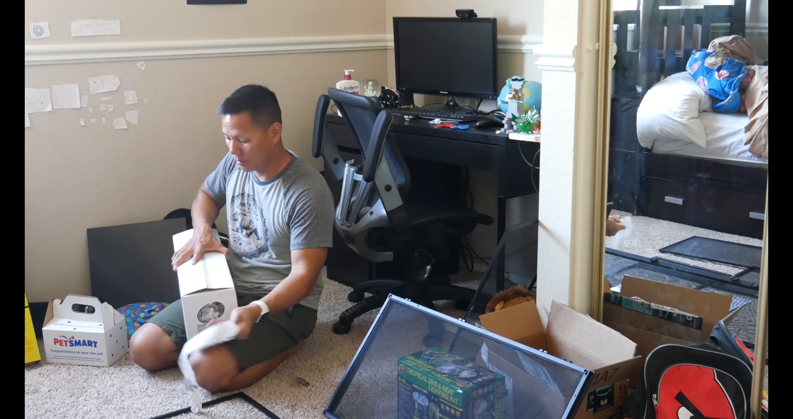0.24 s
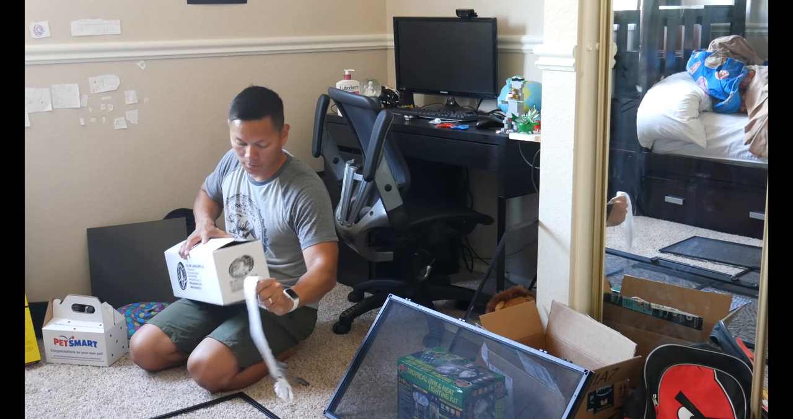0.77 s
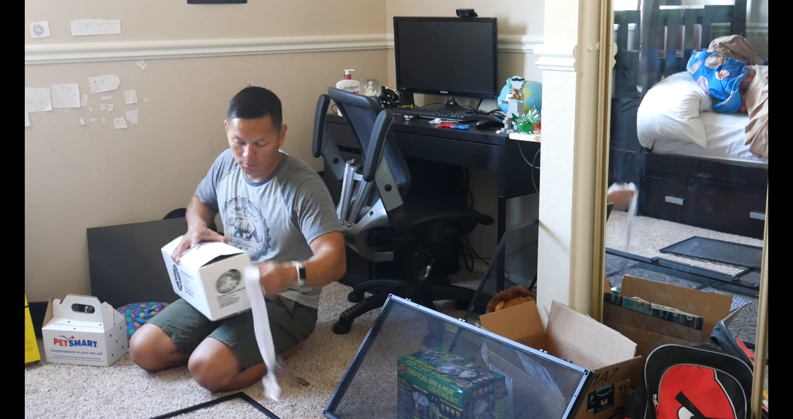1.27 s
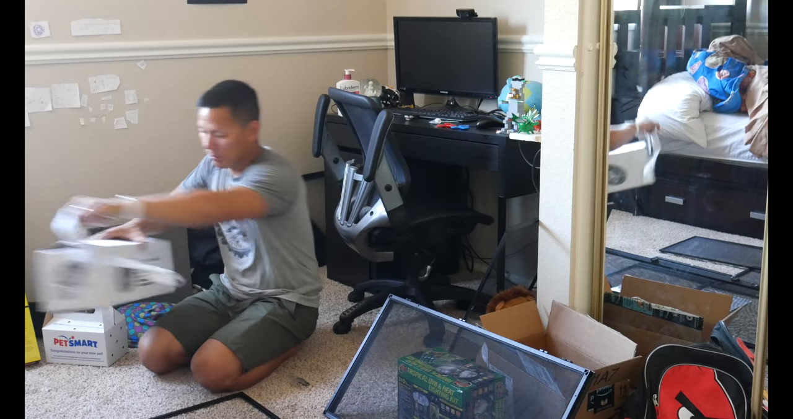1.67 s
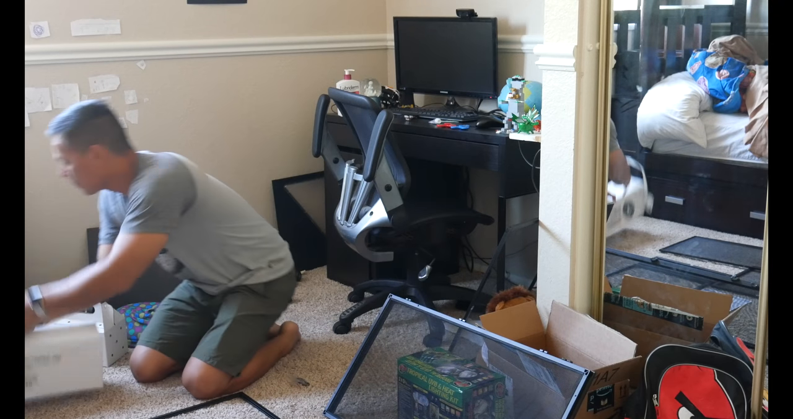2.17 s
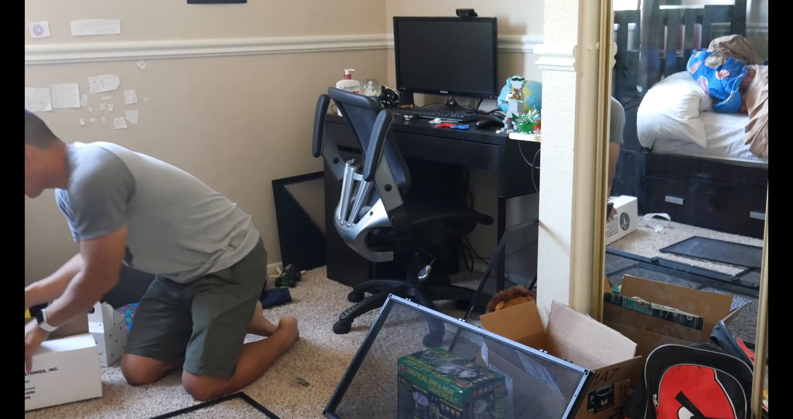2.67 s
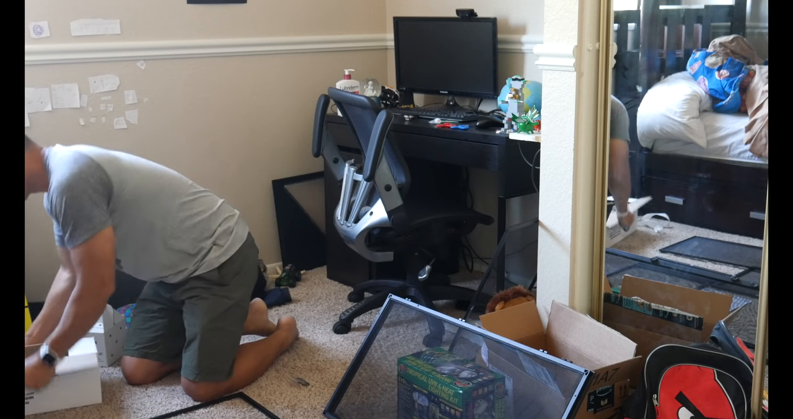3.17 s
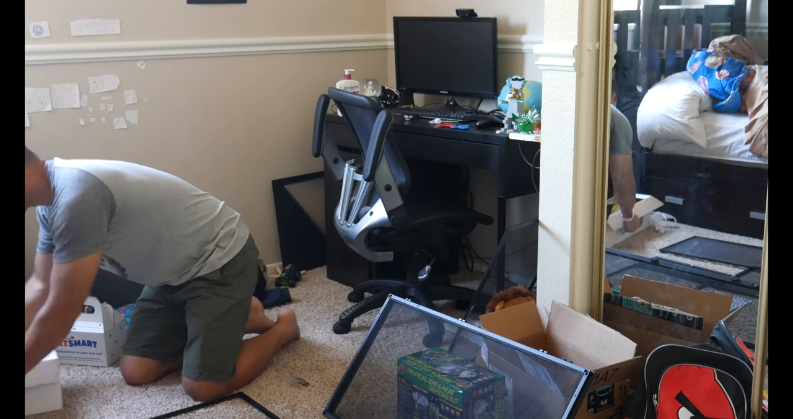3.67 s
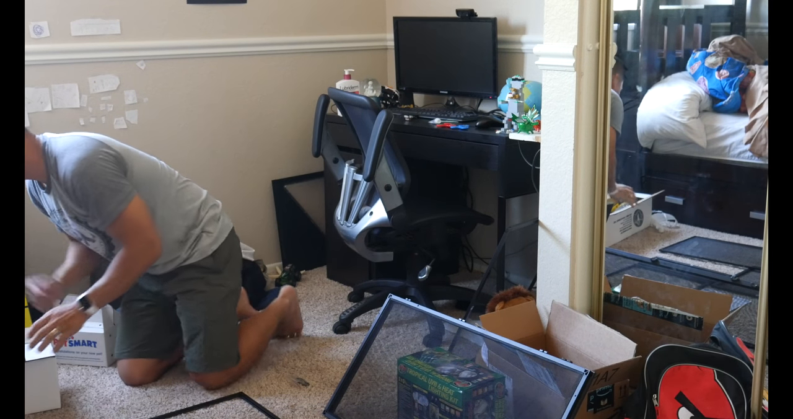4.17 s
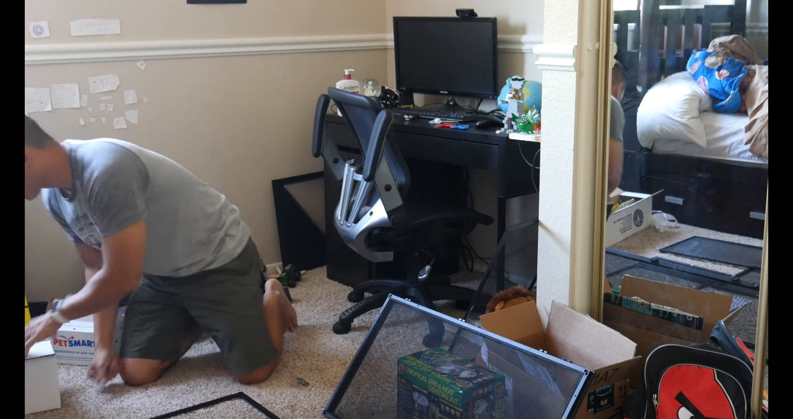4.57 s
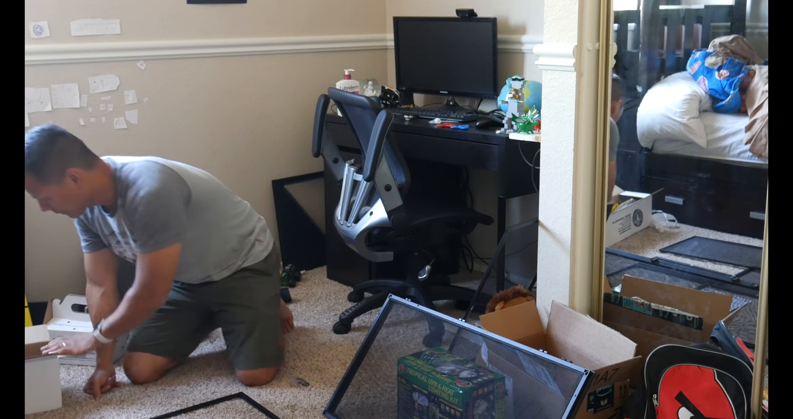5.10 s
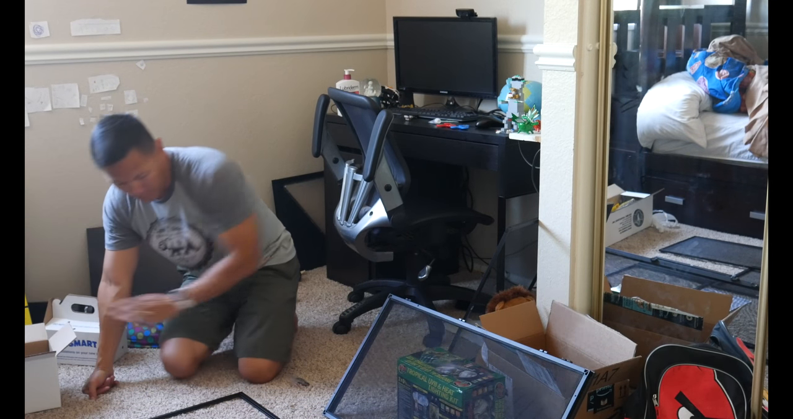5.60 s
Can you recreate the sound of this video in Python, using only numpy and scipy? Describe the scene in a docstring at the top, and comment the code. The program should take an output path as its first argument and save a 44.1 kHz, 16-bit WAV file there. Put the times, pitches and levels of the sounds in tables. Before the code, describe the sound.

Someone rubs and peels tape on a cardboard box, sets it down with a thump, then lightly shuffles boxes.

```python
"""In a small furnished room, a kneeling person peels tape off a cardboard box, sets the box down and
shuffles boxes on the carpet. Stick-slip friction of tape, skin and card drives the modes of the hollow
box and hisses off its surface. Impacts excite the same modes, and tape and card edges snap.
Knees and loads thud the floor at its low resonances; the room reverberates briefly over a faint tone."""
import sys
import numpy as np
from scipy import signal
from scipy.fft import rfft, irfft, next_fast_len
from scipy.io import wavfile
from scipy.ndimage import uniform_filter1d

SR = 44100
rng = np.random.default_rng(int(sys.argv[2]) if len(sys.argv) > 2 else 0)


def wrap_up_sound(samples):
    """Save the sound to the file named by the first command line argument, as 16-bit audio."""
    columns = np.atleast_2d(samples).T
    # keep every value between -1 and 1, then stretch to whole-number steps
    tamed = np.clip(columns, -1, 1)
    steps = np.round(tamed * 32767).astype(np.int16)
    wavfile.write(sys.argv[1], SR, steps)


N = 257808

# Friction spectra of the surface and its crackle. Each row: frequency in Hz, spectral density in dB.
SCRAPE_SPECTRUM = [(880, -0.5), (1500, -2), (1570, -2), (2060, -2.5), (2370, -2), (2960, 2.5), (3120, -1),
                   (5500, -19), (7150, -37), (12100, -120)]
CRACKLE_SPECTRUM = [(2350, -29.5), (4000, -8), (6640, -6), (7230, -8), (9560, -10), (13500, -13),
                    (15600, -24)]


def friction():
    """Stick-slip friction: coarse slips drive the box and join fine ones in hiss and crackle."""
    coarse = slips(1500, spread_db=1.5, clump_db=4.5)
    fine = slips(6000, spread_db=-1.0, clump_db=0.5)
    walls, flaps, liner = box_vibration(coarse)
    hiss = colour(fine * from_db(0.5 * drift(33)) + 0.44 * coarse, SCRAPE_SPECTRUM)
    scrape = rms_one(hiss) + 0.42 * rms_one(liner)
    crackle = colour(fine + 0.31 * coarse, CRACKLE_SPECTRUM)
    layers = zip(effort(), (walls, flaps, scrape, crackle))
    return high_pass(sum(gain * rms_one(x) for gain, x in layers), 161, order=6)


def slips(per_s, spread_db, clump_db):
    """A Poisson process of wandering rate: slips of uneven size come in clumps; rms 1."""
    sizes = from_db(spread_db * np.minimum(rng.exponential(1, N), 4)) * rng.choice([-1, 1], N)
    slipping = rng.random(N) < per_s * from_db(clump_db * drift(40)) / SR
    return rms_one(sizes * slipping)


# Modes of the box. Each row: frequency in Hz, level in dB, free decay time (t60) in seconds.
BOX_MODES = [(219, -14, 0.042), (235.2, -4, 0.088), (284.5, -3, 0.066), (347.7, -0.5, 0.043),
             (451, 3, 0.022), (528, -1.5, 0.067), (621, -5.5, 0.07), (785, -1, 0.055), (934, -2, 0.07),
             (1037.4, -7, 0.12), (1101, -4.5, 0.072), (1266, 2, 0.029), (1507, -7, 0.065),
             (1654, -1.5, 0.018), (2240, -26, 0.093), (2453, -10, 0.063), (2700, -10.5, 0.018),
             (2925, -9, 0.027), (3426, -18, 0.093), (3674, -13.5, 0.085)]
FLAPS_FROM_HZ, LINER_FROM_HZ = 480, 1900
RUB_T60_SHARE, KNOCK_T60_SHARE = 0.36, 0.54   # holding the box damps it


def box_vibration(drive):
    """Forced vibration of walls, flaps and liner; a shifting grip changes each mode's share."""
    parts = np.zeros((3, N))
    for k, (hz, level_db, t60) in enumerate(BOX_MODES):
        part = int(hz > FLAPS_FROM_HZ) + int(hz > LINER_FROM_HZ)
        share = from_db(level_db + 2.2 * drift(10.8))
        parts[part] += (-1) ** k * ring(drive * share, hz, RUB_T60_SHARE * t60)
    walls, flaps, liner = parts
    # a small box radiates no bass
    return high_pass(walls, 119, order=4), high_pass(flaps, 274, order=2), high_pass(liner, 1330, order=4)


# Light, unbroken rubbing. Each row: time in seconds, surface level in dB, then box over surface,
# crackle over surface and walls over flaps, all in dB.
RUBBING = [(0, -34, 0, -6, -8), (.2, -38.5, -5, -4, -0.5), (.45, -48, 0, -14, -0.5), (.68, -59, -8, -8, -5),
           (.9, -48, 1.5, -9, -3), (1.05, -63.5, 6, -7, -3.5), (1.2, -49.5, -2, -7, 7.5),
           (1.55, -48.5, 4.5, -18, -9.5), (1.71, -49.5, -10.5, -20, -14), (1.9, -58, -3, -20, -21),
           (2.0, -45.5, -11, -10, 6), (2.065, -55, 2, -10, 2), (2.1, -48.5, 1, -11, -2),
           (2.47, -52, 4.5, -11, 3.5), (2.8, -48, 1.5, -7, -1), (3.35, -47.5, 0, -13, 3),
           (3.65, -44, -6, -8, -7), (4.05, -62.5, 7, -12, -4), (4.22, -65.5, 2, -1.5, -1),
           (4.33, -59.5, 6, -12.5, -15), (4.64, -61.5, -7, -4, -6), (4.68, -53.5, 10, -16, 4.5),
           (4.95, -49, 2, -8.5, -7), (5.15, -56, 0.5, -7.5, 3.5), (5.6, -58.5, 6.5, -12, -7),
           (5.8, -60.5, 0, -10, -9)]
# Firm strokes of tape, hand or card. Each row: start and length in seconds, then surface level,
# change over the stroke, box over surface and crackle over surface, all in dB.
STROKES = [(0, 0.056, -25.5, -14.5, -3, -9), (0.145, 0.17, -25.5, 4, -0.5, -8.5),
           (0.538, 0.16, -33.5, -3, 0.5, -4.5), (0.723, 0.011, -32, -0.5, 0.5, -8.5),
           (1.224, .15, -49.5, 12.5, -21, -9.5), (1.616, .015, -42.5, -4.5, -18, -12.5),
           (1.773, 0.14, -40.5, 1.5, -9.5, -12), (2.206, .01, -45, 5, -16, -15),
           (2.279, 0.035, -26.5, -1.5, 2.5, -13.5), (2.391, 0.016, -40.5, 1, -1, -21),
           (2.84, 0.1, -43.5, -7, 3, -9), (3.006, 0.18, -43, -4.5, 5, -10.5),
           (3.265, 0.0081, -43.5, -3.5, 18.5, -31), (3.466, .12, -41.5, -4, -5.5, -10),
           (4.8, 0.085, -39.5, -4, 4, -8), (5.005, 0.021, -39, -2.5, -19, -14.5),
           (5.29, .04, -45, -8.5, 1, -20), (5.433, 0.065, -55.5, 8, 3.5, -9)]
RISE_DB_PER_S, FALL_DB_PER_S = 362, 244
SETTLE_DB, SETTLE_DB_PER_S = -9.5, 88   # a fainter rustle lingers after each stroke


def effort():
    """Incoherent sources add in power: rubbing and strokes give wall, flap, surface and crackle gains."""
    t = np.arange(N) / SR
    surface_db, box_db, crackle_db, walls_db = in_time(RUBBING)
    power = from_db(2 * (surface_db + np.array([box_db, np.zeros(N), crackle_db])))
    for start, length, level_db, change_db, box_db, crackle_db in STROKES:
        rise_db = -RISE_DB_PER_S * np.maximum(start - t, 0)
        held_db = level_db + change_db * np.clip((t - start) / length, 0, 1)
        after = np.maximum(t - start - length, 0)
        fade_db = np.maximum(-FALL_DB_PER_S * after, SETTLE_DB - SETTLE_DB_PER_S * after)
        balance_db = np.array([[box_db], [0], [crackle_db]])
        power += from_db(2 * (rise_db + held_db + fade_db + balance_db))
    box, surface, crackle = np.sqrt(power)
    return box * from_db(walls_db), box, surface, crackle


# Knocks on card. Each row: start in seconds, level in dB, pitch of the struck spot in Hz,
# contact decay time in seconds, fall of the modes in dB per octave away from that pitch.
KNOCKS = [(.12, -24, 260, 0.018, 12), (.158, -7, 272, 0.025, 0), (.189, -12, 646, 0.018, 22),
          (.249, -9, 275, 0.017, -0.5), (.278, -10.5, 310, .0099, -5), (.299, -16, 750, 0.019, 22),
          (.329, -22, 610, 0.043, -1), (.448, -21.5, 323, 0.032, 16), (0.473, -27, 284, 0.011, 28),
          (.605, -27, 258, 0.014, 15), (.729, -23, 990, .02, 5), (0.876, -35, 784, 0.025, 8),
          (1.074, -43, 700, 0.011, 18), (1.112, -38, 480, 0.029, 6), (.96, -40.5, 600, .03, 4),
          (1.206, -26, 720, 0.018, 19), (1.211, -35, 230, .015, 17), (1.235, -23.5, 106, .034, 3.5),
          (1.232, -23.5, 480, 0.032, 15), (1.356, -26, 350, 0.0095, 1), (1.993, -39, 252, .018, 0),
          (2.078, -24, 680, 0.028, 16), (2.083, -37, 224, .025, 21), (2.232, -22, 240, 0.0087, 14),
          (2.261, -6.5, 202, 0.02, 2.5), (2.278, -4.5, 408, 0.012, 15), (2.32, -13.5, 375, 0.034, 30),
          (2.408, -25, 266, 0.017, 2), (2.523, -11, 450, 0.026, 4.5), (2.53, -15.5, 250, 0.026, 3),
          (2.568, -24, 230, 0.01, 2), (2.62, -28, 246, 0.013, 8), (2.718, -32.5, 234, 0.04, 4),
          (2.959, -34, 262, .02, 8), (2.986, -22, 425, 0.03, 1.5), (3.035, -29, 198, 0.019, 6),
          (3.151, -22, 463, 0.018, 4), (3.196, -25, 198, 0.033, 25), (3.215, -26, 230, 0.013, 22),
          (3.241, -15, 465, 0.0091, 1), (3.257, -18, 263, 0.0047, 9), (3.285, -26, 268, 0.031, 2.5),
          (3.708, -33, 417, 0.077, 1.5), (4, -52, 130, 0.015, 13), (4.241, -45, 142, 0.026, 0.5),
          (4.468, -38.5, 990, 0.04, -1), (4.514, -43.5, 931, 0.031, -6), (4.657, -30.5, 153, 0.057, 4.5),
          (4.737, -30, 1750, 0.0088, 37), (4.741, -22.5, 920, 0.014, 0.5), (4.76, -25, 945, 0.014, 18),
          (4.837, -28.5, 264, .025, 23), (4.839, -25, 1420, 0.017, 26), (4.988, -38.5, 990, .033, 4),
          (5.179, -38, 264, 0.021, 18), (5.278, -27.5, 507, 0.01, 2), (5.301, -28.5, 313, 0.039, 4),
          (5.428, -37, 297, 0.048, 3), (5.494, -27, 1240, 0.03, 35), (5.504, -38, 1210, 0.022, 31)]
KNOCK_EDGE_DB = -28.5


def knocks():
    """Impact excitation: a rough contact rings the struck spot and the box modes, with a bright edge."""
    out, t = np.zeros(N), np.arange(SR // 4) / SR
    bright = signal.butter(2, [1800, 6000], "band", fs=SR, output="sos")
    for start, level_db, hz, contact_s, fall_db in KNOCKS:
        rough = rng.standard_normal(len(t))
        force = rough * np.exp(-t / contact_s) * (1 - np.exp(-t / 0.0032))
        force[:SR // 2000] += 1.5   # the first touch is one hard blow
        body = 1.03 * ring(force, hz, t60=12 / hz)   # the struck spot
        for k, (mode_hz, mode_db, t60) in enumerate(BOX_MODES):
            share = from_db(mode_db - fall_db * abs(np.log2(mode_hz / hz)))
            body += (-1) ** k * share * ring(force, mode_hz, KNOCK_T60_SHARE * t60)
        body = high_pass(body, 0.54 * min(hz, 600), order=6)
        edge = signal.sosfilt(bright, force + 0.08 * rough * np.exp(-t / 0.0071))
        add(out, start, from_db(level_db) * (crest(body) + from_db(KNOCK_EDGE_DB) * crest(edge)))
    return out


# Snaps of tape and card edges. Each row: start in seconds, level in dB, resonance in Hz,
# treble over resonance in dB.
SNAPS = [(0.534, -35, 2400, 6), (0.721, -26.5, 2420, 2.5), (0.819, -44, 2400, 5),
         (.8556, -36.5, 1940, -1.5), (0.8824, -45, 2440, 2.5), (1.15, -47, 3080, -10),
         (1.1882, -34, 3170, -2), (1.225, -30, 2800, -17), (1.2327, -31.5, 2310, -12),
         (1.2674, -31, 2900, -4), (1.287, -26, 2600, -2), (1.2947, -22.5, 3140, -32),
         (1.3274, -26.5, 3050, -7), (1.358, -29, 2600, -1), (1.3638, -28.5, 2520, -4),
         (1.4935, -39, 2090, -12), (1.559, -39, 3170, -22), (1.606, -24, 3070, -23),
         (1.7464, -36, 3050, -21), (1.7705, -33.5, 2830, -10), (1.8488, -28, 3330, -21),
         (1.88, -31, 3500, -21), (2.2663, -13, 2800, -38), (2.525, -35, 2250, -24),
         (2.7452, -37, 2660, -13), (3.0894, -36, 2750, -14), (3.1201, -31, 2500, -25),
         (3.1538, -27.5, 2680, -29), (3.242, -30, 2620, -25), (3.257, -25.5, 1580, -31),
         (4.2417, -55, 3030, 5), (4.6628, -59, 2000, -8), (4.798, -22.5, 3020, -31),
         (4.8366, -21.5, 3000, -38), (4.884, -32.5, 2420, -23), (4.995, -36, 2800, -5),
         (5.0144, -30, 1900, -16), (5.2825, -33.5, 3420, -22), (5.4251, -42, 3400, -12),
         (5.6024, -53, 2050, 6.5), (5.658, -47, 1940, -20)]
SNAP_T60_S, SNAP_RISE_S = 0.068, 0.00097


def snaps():
    """Transient excitation: a noise burst rings a patch of card, while a spit of treble dies faster."""
    out, t = np.zeros(N), np.arange(SR // 8) / SR
    airy = signal.butter(2, [5000, 12000], "band", fs=SR, output="sos")
    decay_db = -60 * t / SNAP_T60_S
    for start, level_db, hz, treble_db in SNAPS:
        rough = rng.standard_normal(len(t)) * (1 - np.exp(-t / SNAP_RISE_S))
        patch = high_pass(ring(rough * from_db(decay_db), hz, t60=12 / hz), 1300, order=2)
        spit = signal.sosfilt(airy, rough * from_db(decay_db / 0.44))
        snap = patch / np.abs(patch).max() + from_db(treble_db) * spit / np.abs(spit).max()
        add(out, start, from_db(level_db) * snap)
    return out


# Weight on the floor. Each row: start in seconds, level in dB, main resonance in Hz,
# loading time in seconds, relative gain of the upper mode in dB.
THUDS = [(.072, -42, 108, 0.13, -4), (0.45, -32, 59.5, 0.15, 8), (1.243, -26, 48.5, .12, -.5),
         (1.594, -39.5, 52.6, 0.091, -17), (1.897, -46, 97, 0.12, -8), (2.247, -30.5, 79.5, 0.082, -11),
         (2.521, -36, 67.6, 0.41, 19.5), (2.985, -42, 60.5, 0.12, 10.5), (3.213, -28.5, 58.3, 0.28, 10),
         (3.5, -56, 69, 0.079, -11.5), (3.985, -43.5, 43.6, 0.17, 7), (4.249, -46.5, 60.6, 0.16, 11.5),
         (4.64, -35, 97, 0.23, -4), (5.276, -52, 78.5, 0.13, -6)]
FLOOR_T60_S, FLOOR_UPPER_HZ = 0.22, 131.6


def thuds():
    """Damped resonance: a soft push and the uneven loading after it ring the floor's low modes."""
    out, t = np.zeros(N), np.arange(SR) / SR
    soft = signal.butter(2, 150, fs=SR, output="sos")
    push = np.sin(np.pi * np.minimum(t / 0.0083, 1))
    for start, level_db, hz, loading_s, upper_db in THUDS:
        loading = rng.standard_normal(SR) * np.exp(-(t / loading_s) ** 2)
        force = push + 3.6 * signal.sosfilt(soft, loading)
        boom = ring(force, hz, FLOOR_T60_S)
        boom += ring(force, 1.1 * hz, 0.26 * FLOOR_T60_S)
        boom += 0.5 * ring(force, 0.81 * hz, 0.6 * FLOOR_T60_S)
        boom += from_db(upper_db) * ring(force, FLOOR_UPPER_HZ, t60=0.085)
        add(out, start, from_db(level_db) * crest(high_pass(boom, 37, order=2)))
    return out


ROOM_T60_S, ROOM_DB, WALL_CUT_HZ = 0.25, -21, 4000


def reverberation(x, paths):
    """Repeated reflection: absorption leaves each echo weaker and duller on every round trip."""
    out, pole = np.zeros(N), np.exp(-2 * np.pi * WALL_CUT_HZ / SR)
    lags = (rng.uniform(0.006, 0.025, paths) * SR).astype(int)
    for k, lag in enumerate(lags):
        gain = from_db(-60 * lag / SR / ROOM_T60_S)
        loop, state = x.copy(), [0.]
        for i in range(lag, N, lag):
            echo, state = signal.lfilter([gain * (1 - pole)], [1, -pole], loop[i - lag:i], zi=state)
            loop[i:i + lag] += echo[:N - i]
        out += (loop - x) * (-1) ** k
    return out


# Background of the room. Each row: frequency in Hz, relative spectral density in dB.
ROOM_TONE_SPECTRUM = [(15, -36), (25, 1), (59, 10), (116, -3), (183, -1.5), (948, -1.5), (1630, -9.5),
                      (2710, -4.5), (4290, -51), (12200, -41), (15600, -32)]
ROOM_TONE_DB = -60


def room_tone():
    """Ambient noise: a faint, mostly low rush whose level wanders slightly."""
    gain = from_db(ROOM_TONE_DB + 0.5 * drift(1))
    return gain * rms_one(colour(rng.standard_normal(N), ROOM_TONE_SPECTRUM))


# Difference between left and right. Each row: frequency in Hz, side over mid in dB before the flicker.
WIDTH_SPECTRUM = [(60, -26), (110, -36), (200, -31), (380, -27.5), (700, -31.5), (1290, -30), (2380, -27.5),
                  (4400, -23), (8120, -20.5), (15000, -16)]
SIDE_HISS_DB = -72


def stereo_side(mid):
    """Left and right differ by a faint, flickering share, most in the treble, over a faint hiss."""
    flicker = colour(mid, WIDTH_SPECTRUM) * drift(170) * from_db(8.3 * drift(7.5))
    hiss = high_pass(rng.standard_normal(N), 4100, order=2)
    return high_pass(flicker, 190, order=1) + from_db(SIDE_HISS_DB) * hiss


def ring(x, hz, t60):
    """Damped oscillator: a unit impulse starts a decaying sine of height 1."""
    r, w = from_db(-60 / (t60 * SR)), 2 * np.pi * hz / SR
    return signal.lfilter([0, np.sin(w)], [1, -2 * r * np.cos(w), r * r], x + 1e-18)


def drift(rate_hz):
    """Low-passed noise: a random wander of rms 1."""
    step, warm_up = 40, 2000
    r = np.exp(-2 * np.pi * rate_hz * step / SR)
    noise = rng.standard_normal(N // step + warm_up + 2)
    slow = signal.lfilter([1], [1, -2 * r, r * r], noise)[warm_up:]
    return np.interp(np.arange(N) / step, np.arange(len(slow)), rms_one(slow))


def colour(x, spectrum):
    """Spectral shaping by (Hz, dB) points joined on a log frequency axis."""
    size = next_fast_len(N)
    log_hz = np.log(np.arange(size // 2 + 1) * SR / size + 1)
    hz, db = np.transpose(spectrum)
    gain = from_db(np.interp(log_hz, np.log(hz), db))
    return irfft(rfft(x, size) * gain, size)[..., :N]


def high_pass(x, hz, order):
    """Butterworth high-pass."""
    return signal.sosfilt(signal.butter(order, hz, "high", fs=SR, output="sos"), x)


def in_time(rows):
    """Linear interpolation of timed rows to every sample."""
    times, *columns = np.transpose(rows)
    return [np.interp(np.arange(N) / SR, times, column) for column in columns]


def from_db(db):
    """Decibels to amplitude gain."""
    return 10 ** (np.asarray(db) / 20)


def rms_one(x):
    """Scale to rms 1."""
    return x / np.sqrt(np.mean(x ** 2) + 1e-20)


def crest(x):
    """Scale so that the loudest 10 ms have rms 1/2."""
    return x / (2 * np.sqrt(uniform_filter1d(x ** 2, SR // 100).max()))


def add(out, start_s, x):
    """Mix x into out from start_s."""
    i = int(start_s * SR)
    out[i:i + len(x)] += x[:N - i]


def scene():
    """Superposition: boxes, their echoes, floor and room tone sum, then spread to left and right."""
    boxes = friction() + knocks() + snaps()
    tone = room_tone()
    mid = boxes + from_db(ROOM_DB) * reverberation(boxes, paths=8) + thuds() + tone
    side = stereo_side(mid)
    return np.array([mid + side, mid - side])


def record(dry):
    """Soft saturation rounds the peaks; a steep low-pass cuts the highest treble."""
    low_pass = signal.ellip(9, 0.5, 45, 15700, fs=SR, output="sos")
    return signal.sosfilt(low_pass, 0.8 * np.tanh(dry / 0.8))


dry = scene()
out = record(dry)
wrap_up_sound(out)
```